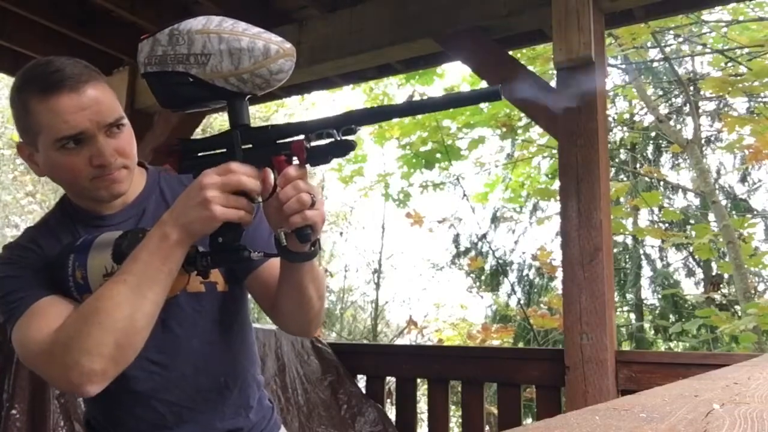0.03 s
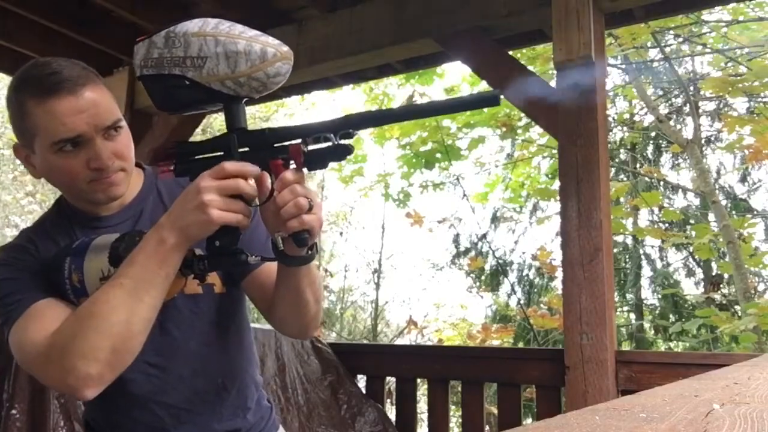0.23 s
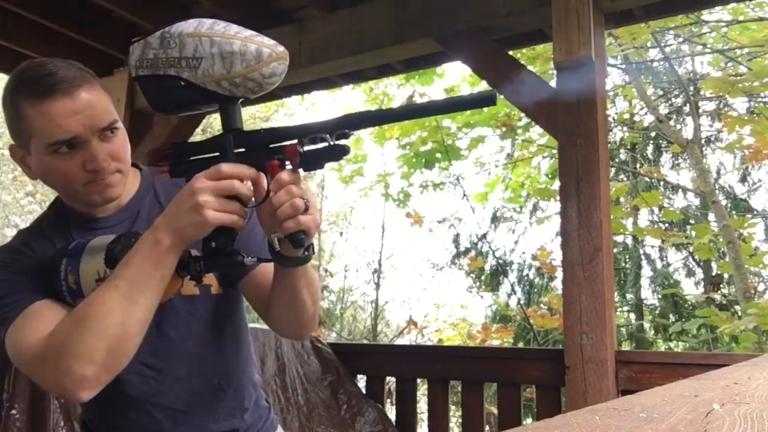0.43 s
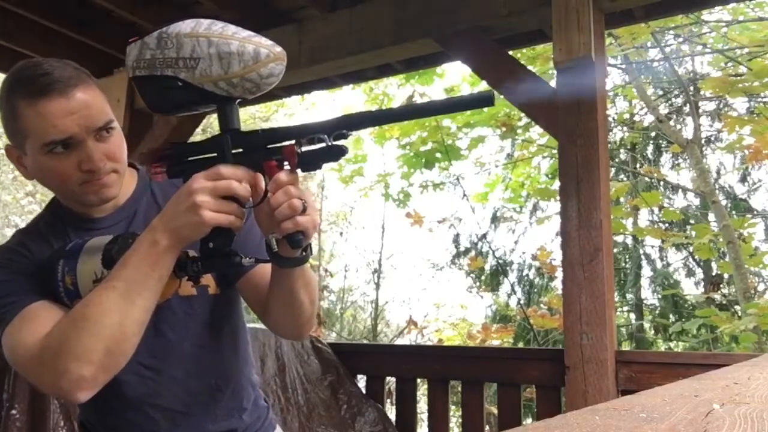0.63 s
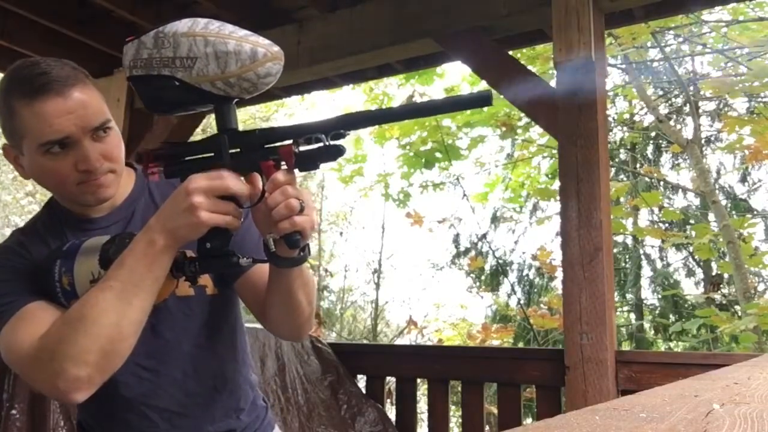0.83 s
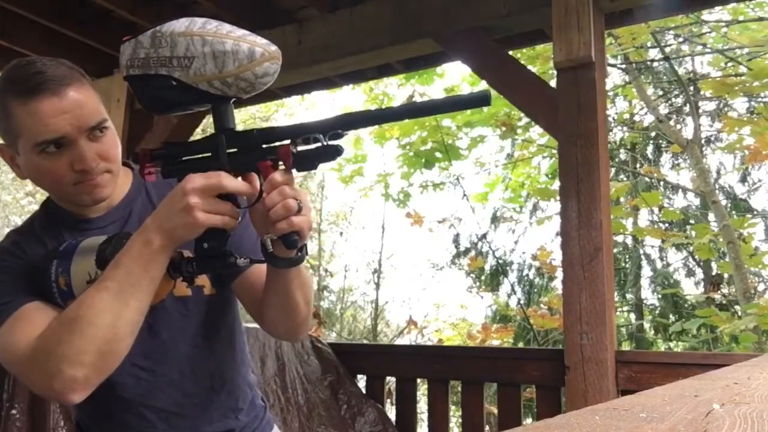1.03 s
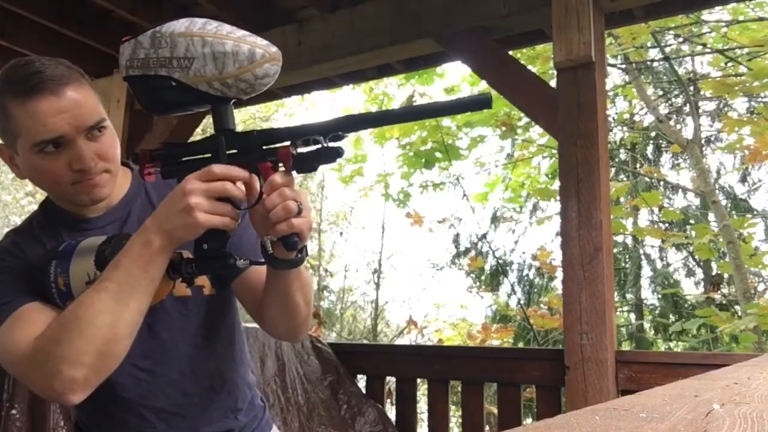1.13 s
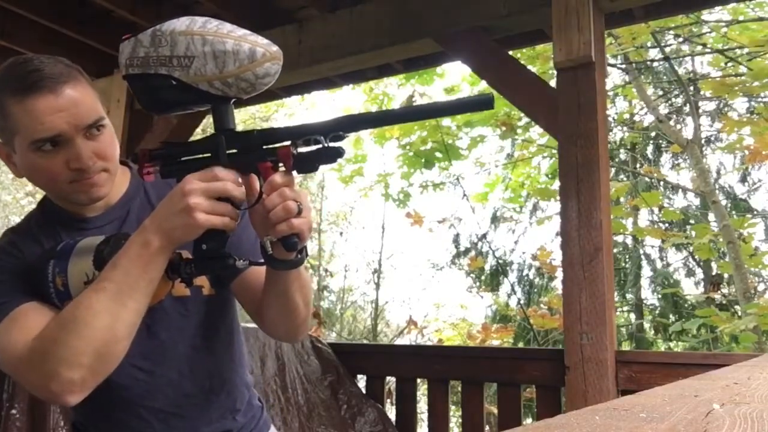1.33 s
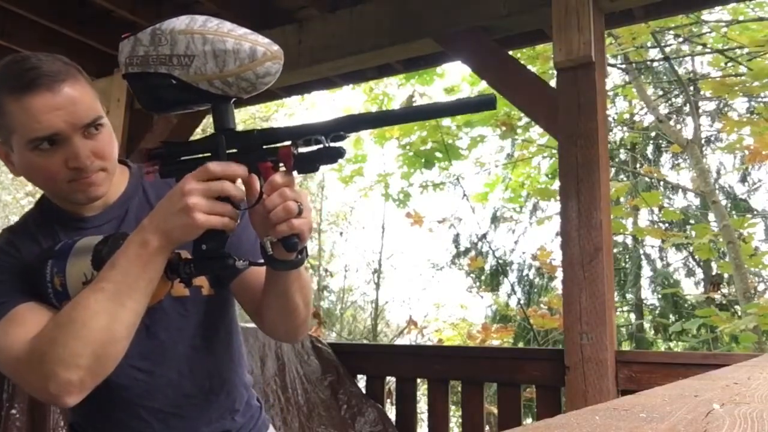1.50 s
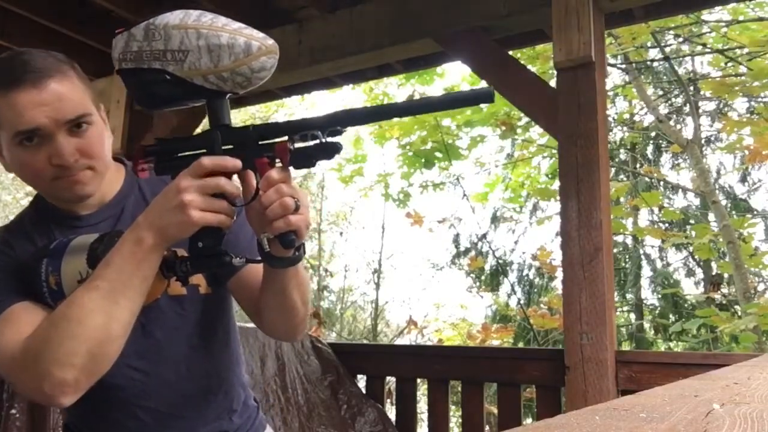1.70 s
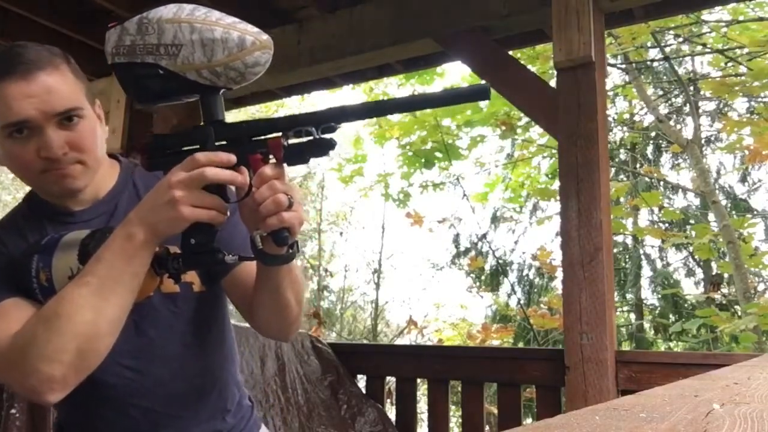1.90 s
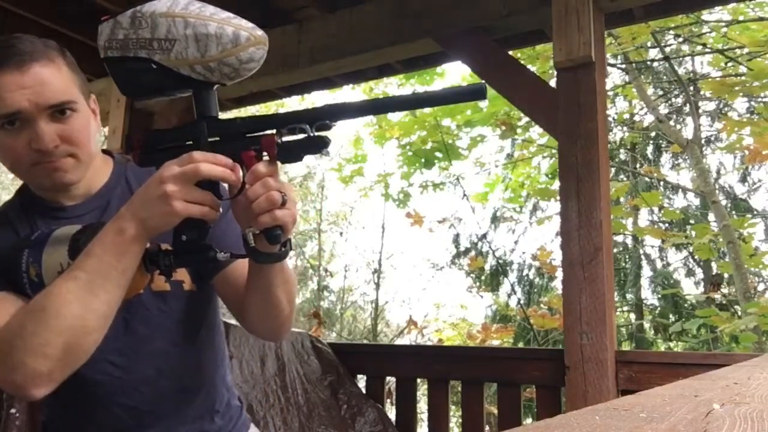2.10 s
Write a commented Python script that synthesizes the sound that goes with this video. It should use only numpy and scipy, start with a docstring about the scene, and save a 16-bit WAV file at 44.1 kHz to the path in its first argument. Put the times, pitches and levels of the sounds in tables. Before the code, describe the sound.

A paintball marker fires eleven quick, even, loud pops with metallic clacking between them, then three slower shots, one with a hollow gas puff, and a final dry clack; close microphone on a roofed outdoor deck.

```python
"""A faint outdoor rush and a fading hiss come first; a pneumatic paintball marker then fires on a roofed deck.
It fires eleven quick shots and three slower ones, cycles once without firing, and soft taps end the scene.
A shot sums minimum-phase pressure pulses, damped modes and decaying noise; before every shot but the first
the action ticks, slams back and clacks shut, as noise bursts with metallic modes.
Roof, boards and railing answer by convolution with discrete echoes and decaying noise."""
import sys
import numpy as np
from scipy import signal
from scipy.fft import rfft, irfft, next_fast_len
from scipy.io import wavfile

SR = 44100
rng = np.random.default_rng(int(sys.argv[2]) if len(sys.argv) > 2 else 0)


def unload_audio(sound):
    """Save the sound as a 16-bit wav file, at the path given as the first command line argument."""
    columns = np.transpose(np.atleast_2d(sound))
    # keep every value between -1 and 1, then stretch to whole-number steps
    steps = np.round(np.clip(columns, -1, 1) * 32767)
    wavfile.write(sys.argv[1], SR, steps.astype(np.int16))


N = 94859  # length of the scene in samples
T = np.arange(SR // 4) / SR  # time axis of one sound event, s


def amp(db):
    """Level to amplitude: 20 dB is a factor of ten."""
    return 10 ** (np.asarray(db) / 20)


def unit(x):
    """Normalization of a signal to an rms of 1."""
    return x / np.sqrt(np.mean(x ** 2) + 1e-20)


def along(points, hz):
    """Interpolation of (f/Hz, value) points along a logarithmic frequency axis."""
    f, v = np.transpose(points)
    return np.interp(np.log(hz + 1), np.log(f + 1), v)


def filtered(x, response):
    """Linear filtering: the spectrum is multiplied by a frequency response."""
    m = next_fast_len(len(x) + SR // 8)
    spectrum = rfft(x, m) * response(np.fft.rfftfreq(m, 1 / SR))
    return irfft(spectrum, m)[:len(x)]


def noise(tone, size=len(T)):
    """Spectral shaping of white noise, at rms 1."""
    white = rng.standard_normal(size)
    return unit(filtered(white, lambda hz: amp(along(tone, hz))))


def fade(t60, hold=0):
    """Exponential decay: after the hold the level falls 60 dB per t60."""
    return amp(-60 * np.maximum(T - hold, 0) / t60)


def rise(seconds):
    """First-order build-up with a time constant in seconds."""
    return 1 - np.exp(-T / seconds)


def pulse(tone):
    """Minimum phase: the folded cepstrum of a spectrum gives its causal pulse, of energy 1."""
    size = 2 * len(T)
    cepstrum = irfft(np.log(amp(along(tone, np.fft.rfftfreq(size, 1 / SR)))))
    cepstrum[1:size // 2] *= 2
    cepstrum[size // 2 + 1:] = 0
    p = irfft(np.exp(rfft(cepstrum)))[:len(T)]
    return p / np.linalg.norm(p)


def add(track, s, sound):
    """Superposition of a sound on a track from time s, in seconds."""
    i = max(round(s * SR), 0)
    track[i:i + len(sound)] += sound[:len(track[i:])]


def ring(modes, scatter_db):
    """Modal superposition: damped sines (f/Hz, level/dB, t60/s), their levels scattered at each strike."""
    total = np.zeros(len(T))
    for hz, db, t60 in modes:
        gain = amp(db + scatter_db * rng.standard_normal())
        total += gain * np.sin(2 * np.pi * hz * T) * fade(t60)
    return total


# spectral density of the outdoor rush: f/Hz, relative level per Hz/dB
RUSH_TONE = [(20, -34.5), (45, 1.5), (90, -1.5), (140, -11), (250, -7), (500, -17), (900, -16), (1600, -16),
             (3000, -26), (5000, -36), (8000, -48.5), (16000, -74)]
# its rms level over time: t/s, level/dB
RUSH_LEVEL = [(0, -36), (1.0, -42.5), (1.298, -44), (1.65, -46), (1.901, -42.5), (2.15, -42)]


def outdoors():
    """Stationary broadband noise under a slow level contour: a faint, low rush from the woods."""
    level_db = np.interp(np.arange(N) / SR, *np.transpose(RUSH_LEVEL))
    return amp(level_db) * noise(RUSH_TONE, size=N)


# spectrum of gas noise, also used by shots, vent and action: f/Hz, relative level/dB
GAS_TONE = [(200, 10), (1000, -0.5), (2000, -2), (4000, -6), (5800, -13.5), (7200, -12.5), (9000, -8.5),
            (11500, -2.5), (14000, -8), (16000, -16.5)]
WASH_DB, WASH_T60_S = -37.5, 0.37


def wash():
    """Exponential decay of diffuse noise: a hissy echo under the roof, already dying away at the start."""
    out = np.zeros(N)
    add(out, 0, amp(WASH_DB) * noise(GAS_TONE) * fade(WASH_T60_S))
    return out


# shots: t/s, relative level of pop and blast/dB, relative level of gas/dB
SHOTS = [(.028, -2, 4), (.128, -2.5, 0), (0.2153, -1.5, 0), (.3027, -2.5, -0.5), (0.3886, 0.5, -12),
         (0.489, -3.5, 3.5), (0.582, -3, 0.5), (0.6709, -3, 0), (.754, -2, -1.5), (0.843, -4.5, 1.5),
         (0.9102, -4, 3), (1.128, -1, 3), (1.4428, -10, -2), (1.5283, -3, -3)]
# spectra of the two pressure pulses of a shot: f/Hz, relative level/dB
POP_TONE = [(30, -33.5), (90, 7), (250, -1.5), (420, 14.5), (800, -7), (1150, -7), (1500, -6), (2500, -5.5),
            (5000, -36.5), (16000, -4)]
BLAST_TONE = [(30, -15), (120, 1), (400, 1), (720, -14), (1150, -17.5), (1500, 9.5), (2000, -5), (2700, 1),
              (5000, -9), (16000, -34.5)]
POP_DB, BLAST_DB, BLAST_DELAY_S = 9, 11, .0034
# resonances of marker and deck that a shot rings: f/Hz, bandwidth/Hz, relative level/dB
BODY = [(165, 26, -0.5), (328, 55, -11.5), (378, 15, 2), (607, 82, 7), (687, 15, -3), (742, 43, 6),
        (956.6, 42, 13), (1252, 13, 6), (1524, 130, 7), (1512, 16.3, 0), (1596, 25, -6.5),
        (1878, 76, -11.5), (2520, 54, -2), (2850, 74, -19)]
BODY_DB, BODY_SCATTER_DB = 13.5, 1.5
GAS_DB, GAS_ATTACK_S, GAS_HOLD_S, GAS_T60_S = -12, 0.00055, 0.0036, 0.0065
CRACK_DB, CRACK_T60_S = -3.5, 0.0045
THUMP_HZ, THUMP_DB, THUMP_T60_S, THUMP_RISE_S = 73, -18, 0.066, 0.011
SHOT_WET_DB = 0  # strength of the deck's answer


def shots():
    """Impulsive excitation: valve pop and gas, then a blast and crack as the ball leaves, ringing the body."""
    out = np.zeros(N)
    pop = amp(POP_DB) * pulse(POP_TONE)
    blast = amp(BLAST_DB) * pulse(BLAST_TONE)
    # t60 is inverse to bandwidth; weighting by bandwidth keeps the resonance peaks at their tabled ratios
    modes = [(hz, db + 20 * np.log10(width), np.log(1000) / np.pi / width) for hz, width, db in BODY]
    thump_sine = np.sin(2 * np.pi * THUMP_HZ * T)
    thump = -amp(THUMP_DB) * thump_sine * rise(THUMP_RISE_S) * fade(THUMP_T60_S)
    for s, db, gas_db in SHOTS:
        modal = ring(modes, BODY_SCATTER_DB)
        body = amp(BODY_DB) * modal / np.linalg.norm(modal)
        gas = amp(GAS_DB + gas_db) * noise(GAS_TONE) * rise(GAS_ATTACK_S) * fade(GAS_T60_S, GAS_HOLD_S)
        crack = amp(CRACK_DB) * noise(GAS_TONE) * fade(CRACK_T60_S)
        shot = amp(db) * (pop + thump) + gas
        add(shot, BLAST_DELAY_S, amp(db) * (blast + crack + body))
        add(out, s, deck(shot, SHOT_WET_DB))
    return out


# echoes off nearby boards: delay/s, relative amplitude
BOARDS = [(.0026, 0.47), (.0062, 0.27), (.0088, 0.25)]
# spectrum of the dense scatter under the roof, thin in the bass: f/Hz, relative level/dB
NEAR_TONE = [(50, -30), (160, -22), (400, -9), (1000, -3), (3000, 0), (6500, 2), (10000, -2), (16000, -4)]
NEAR_DB, NEAR_T60_S, NEAR_DELAY_S = -5.5, 0.082, .004
# spectrum of the longer tail: f/Hz, relative level/dB
FAR_TONE = [(50, -20), (160, -9.5), (400, -1), (1500, -0.5), (6000, 7), (10000, -0.5), (16000, -11.5)]
# its reverberation time: f/Hz, t60/s
FAR_T60 = [(100, 0.19), (1500, 0.17), (6000, 0.19), (14000, 0.2)]
FAR_DB = -10.5


def deck(x, wet_db):
    """Convolution with an impulse response: discrete board echoes, dense roof scatter and a thin longer tail."""
    answer = np.zeros(SR // 2)
    for delay, share in BOARDS:
        add(answer, delay, np.array([share]))
    near = noise(NEAR_TONE) * fade(NEAR_T60_S)
    add(answer, NEAR_DELAY_S, amp(NEAR_DB) * near / np.linalg.norm(near))
    # each frequency band of the tail decays at its own rate
    hz, t, bands = signal.stft(noise(FAR_TONE, size=SR // 2), SR, nperseg=256)
    decay = amp(-60 * t / along(FAR_T60, hz)[:, None])
    far = signal.istft(bands * decay, SR)[1]
    add(answer, 2 * NEAR_DELAY_S, amp(FAR_DB) * far / np.linalg.norm(far))
    heard = amp(wet_db) * signal.fftconvolve(x, answer)
    add(heard, 0, x)
    return heard


# strokes of the action: t of the back stop/s, relative stop level/dB, relative clack level/dB
CYCLES = [(0.0991, -1.5, -1), (.1872, -0.5, -4.5), (0.2761, -1.5, -4), (0.3667, -2.5, -1.5),
          (0.4681, -1.5, -4.5), (0.56, -1.5, -2), (0.6499, 0, -5.5), (0.732, -1.5, -5.5),
          (0.8211, -1.5, -5.5), (.889, -0.5, -9.5), (1.1067, -0.5, 1.5), (1.3904, 3.5, 0),
          (1.506, -2, -0.5), (1.7917, 2.5, 0)]
# spectra of sear tick, back stop and closing clack: f/Hz, relative level/dB
SEAR_TONE = [(100, -27), (800, -14), (1500, 2), (2300, 2), (4000, -15), (6000, -3.5), (8000, -26),
             (12000, -22), (16000, -17.5)]
STOP_TONE = [(100, -20), (700, -12.5), (1250, 0.5), (2000, 2), (2800, -4.5), (4200, -1), (6000, -8),
             (7500, -17.5), (11000, -16.5), (16000, -13)]
CLACK_TONE = [(100, -22), (1000, -6.5), (2000, -5), (3100, 3), (4300, -4), (7000, -17), (12500, -11.5),
              (16000, -15.5)]
SEAR_LEAD_S, SEAR_DB, SEAR_T60_S = .011, -19, 0.0077
RAM_DB, RAM_T60_S = -39, .03
STOP_DB, STOP_T60_S, STOP_HOLD_S = -15, 0.015, 0.00052
CLACK_LAG_S, CLACK_DB, CLACK_HOLD_S, CLACK_T60_S = .0162, -16, 0.0019, .011
# modes of the metal parts: f/Hz, relative level/dB, t60/s
METAL = [(1230, -7, 0.24), (1322, 3.5, 0.046), (1432, -6.5, 0.067), (2820, -4, 0.038), (2927, -11.5, .04),
         (3440, -20, .04), (4280, -3, .03)]
METAL_DB, METAL_SCATTER_DB = -28.5, 1.5
ACTION_WET_DB = -2.5


def action():
    """Impact excitation of metal modes: the sear ticks, air drives the ram to its stop, the bolt clacks shut."""
    out = np.zeros(N)
    for s, db, clack_db in CYCLES:
        sear = amp(SEAR_DB) * noise(SEAR_TONE) * fade(SEAR_T60_S)
        air = amp(RAM_DB) * noise(GAS_TONE) * fade(RAM_T60_S, hold=SEAR_LEAD_S)
        stop = amp(STOP_DB) * noise(STOP_TONE) * fade(STOP_T60_S, STOP_HOLD_S)
        stop += amp(METAL_DB) * ring(METAL, METAL_SCATTER_DB)
        clack = amp(CLACK_DB) * noise(CLACK_TONE) * fade(CLACK_T60_S, CLACK_HOLD_S)
        clack += amp(METAL_DB - 5) * ring(METAL, METAL_SCATTER_DB)
        stroke = amp(db) * (sear + air)
        add(stroke, SEAR_LEAD_S, amp(db) * stop)
        add(stroke, SEAR_LEAD_S + CLACK_LAG_S, amp(clack_db) * clack)
        add(out, s - SEAR_LEAD_S, deck(stroke, ACTION_WET_DB))
    return out


# small clicks of trigger and hopper: t/s, relative level/dB
TICKS = [(1.0271, -31.5), (1.0655, -25), (1.2496, -24), (1.3049, -28), (1.3468, -23.5), (1.6452, -25.5),
         (1.7304, -34), (1.7414, -19.5)]
# slides of the trigger before a slow stroke: t/s, length/s, level/dB
PULLS = [(1.353, 0.018, -45.5), (1.74, 0.046, -47.5)]
# spectrum of both: f/Hz, relative level/dB
TICK_TONE = [(200, -7), (1500, 1), (3000, -6), (7000, -12), (15000, -23.5)]
TICK_DB, TICK_T60_S, TICK_WET_DB = -11.5, 0.014, 2.5
PULL_RISE_S, PULL_T60_S = 0.0028, .03


def ticks():
    """Impact and friction noise: trigger and hopper click faintly; the trigger rubs as it is pulled."""
    out = np.zeros(N)
    for s, db in TICKS:
        add(out, s, amp(db + TICK_DB) * noise(TICK_TONE) * fade(TICK_T60_S))
    for s, length, db in PULLS:
        add(out, s, amp(db) * noise(TICK_TONE) * rise(PULL_RISE_S) * fade(PULL_T60_S, length))
    return out


# spectrum of the bolt's scrape: f/Hz, relative level/dB
SCRAPE_TONE = [(100, -29), (400, -9.5), (1100, -8.5), (2000, -9), (3000, -9), (4500, -17), (16000, -40)]
SCRAPE_S, SCRAPE_DB, SCRAPE_RISE_S, SCRAPE_HOLD_S, SCRAPE_T60_S = 1.432, -13, 0.0047, 0.017, 0.12
VENT_S, VENT_DB, VENT_RISE_S, VENT_HOLD_S, VENT_T60_S = 1.443, -9, 0.006, 0.012, 0.022
BOOM_HZ, BOOM_DB, BOOM_T60_S = 175, -11.5, 0.079
VENT_WET_DB = -8


def vent():
    """Friction, jet noise and resonance: once the bolt scrapes home and gas escapes in a longer, hollow puff."""
    out = np.zeros(N)
    scrape = noise(SCRAPE_TONE) * rise(SCRAPE_RISE_S) ** 2 * fade(SCRAPE_T60_S, SCRAPE_HOLD_S)
    puff = noise(GAS_TONE) * rise(VENT_RISE_S) * fade(VENT_T60_S, VENT_HOLD_S)
    boom = np.sin(2 * np.pi * BOOM_HZ * T) * rise(VENT_RISE_S) * fade(BOOM_T60_S, VENT_HOLD_S)
    add(out, SCRAPE_S, amp(SCRAPE_DB) * scrape)
    add(out, VENT_S, amp(VENT_DB) * puff + amp(BOOM_DB) * boom)
    return out


# spectrum of the dull taps: f/Hz, relative level/dB
PATTER_TONE = [(60, -2), (250, 0), (600, -9), (1500, -3), (3000, -4), (5000, -22), (9000, -40),
               (16000, -50)]
PATTER_S, PATTER_GAP_S, PATTER_DB, PATTER_RISE_S, PATTER_T60_S = 1.883, 0.059, -42, .002, .06


def patter(count=6):
    """Periodic repetition of decaying noise bursts: soft, dull taps follow each other evenly."""
    out = np.zeros(N)
    for k in range(count):
        tap = noise(PATTER_TONE) * rise(PATTER_RISE_S) * fade(PATTER_T60_S)
        add(out, PATTER_S + k * PATTER_GAP_S, amp(PATTER_DB) * tap)
    return out


def scene():
    """Superposition of the marker under the deck roof and the outdoors behind."""
    background = outdoors() + wash() + patter()
    marker = shots() + action()  # already carry the deck's answer
    marker += deck(ticks(), TICK_WET_DB)[:N]
    marker += deck(vent(), VENT_WET_DB)[:N]
    return (background + marker)[None]


LOW_CUT_HZ, TOP_HZ = 51.4, 15900
CLIP_TOP, CLIP_HARDNESS = 1.0, 6  # limiting amplitude, exponent of the knee


def record(dry):
    """Band limiting and soft saturation: the microphone drops deep bass, rounds peaks and cuts the top."""
    high_pass = signal.butter(4, LOW_CUT_HZ, 'highpass', fs=SR, output='sos')
    x = signal.sosfilt(high_pass, dry[0])
    x = x / (1 + np.abs(x / CLIP_TOP) ** CLIP_HARDNESS) ** (1 / CLIP_HARDNESS)
    return filtered(x, lambda hz: hz < TOP_HZ)[None]


dry = scene()
out = record(dry)
unload_audio(out)
```